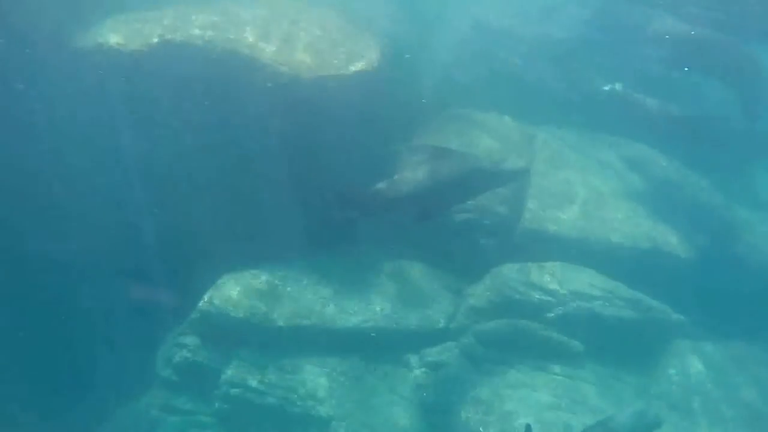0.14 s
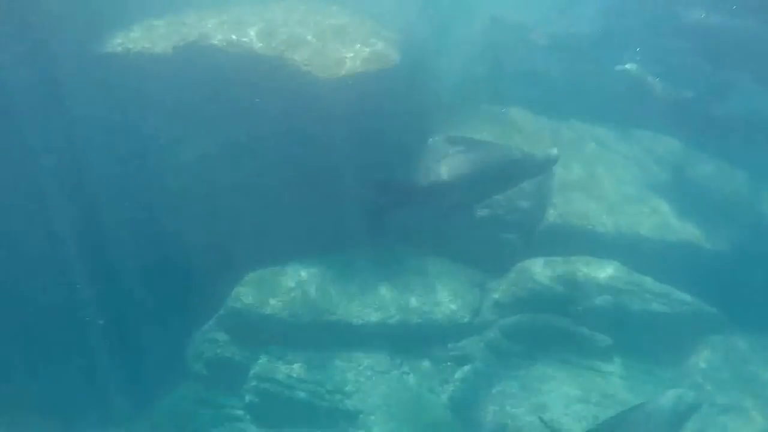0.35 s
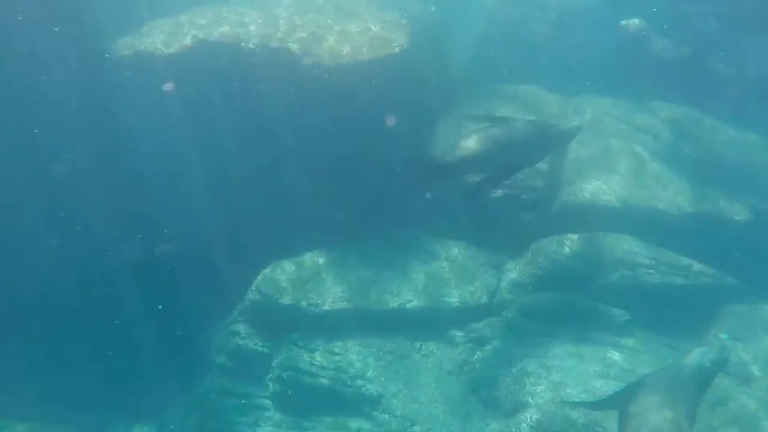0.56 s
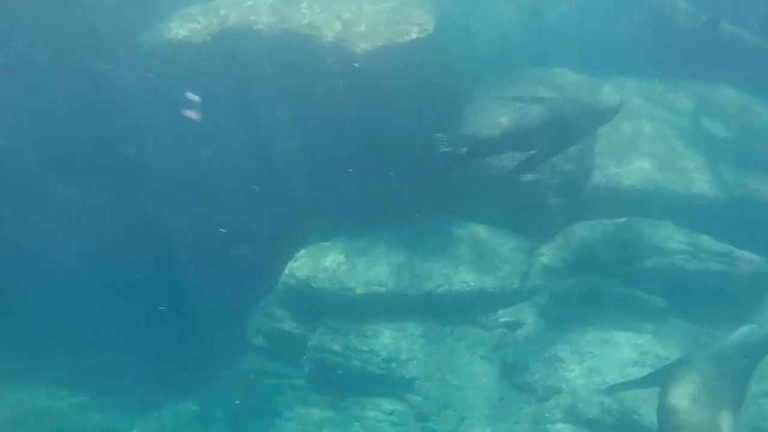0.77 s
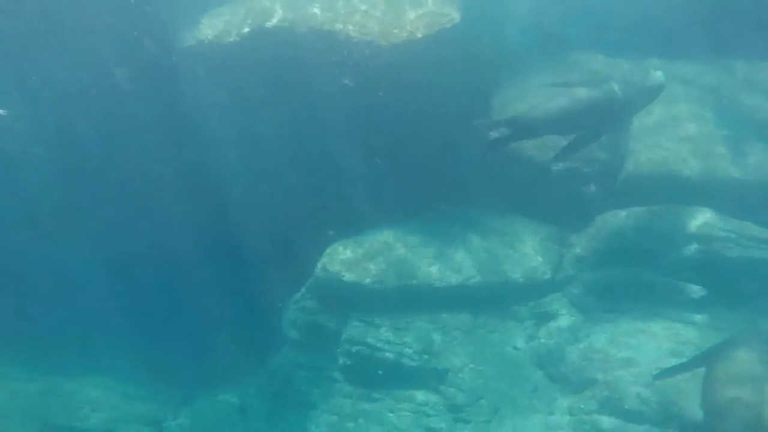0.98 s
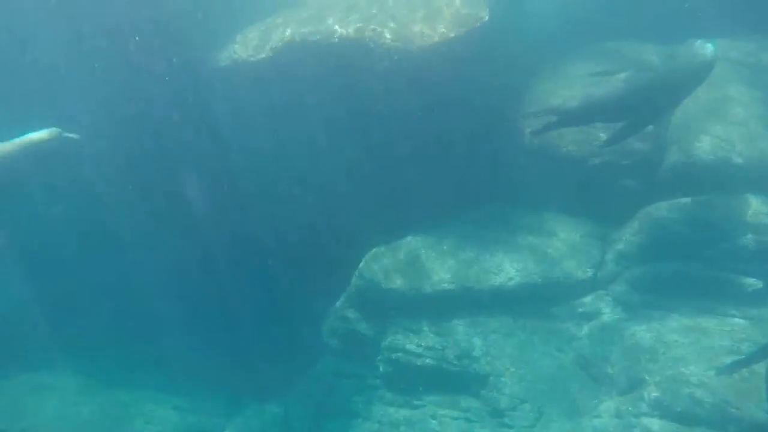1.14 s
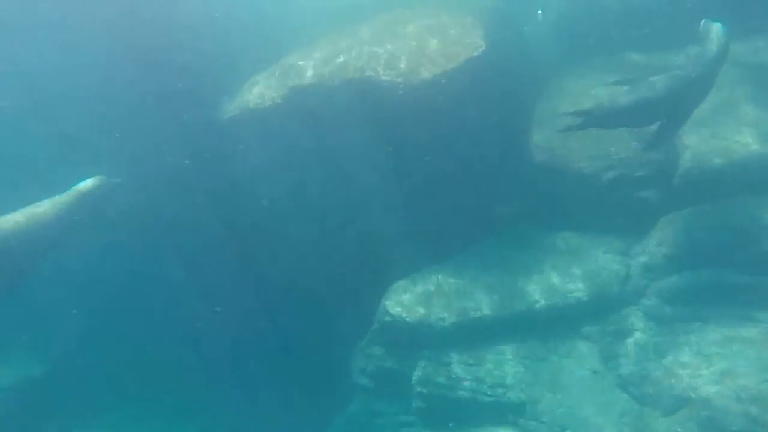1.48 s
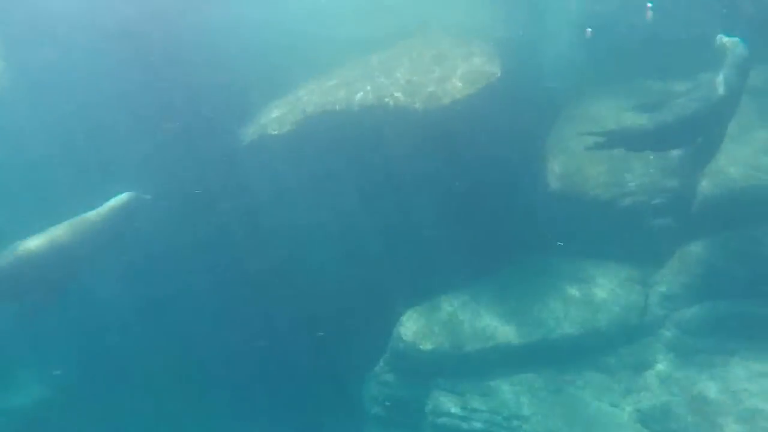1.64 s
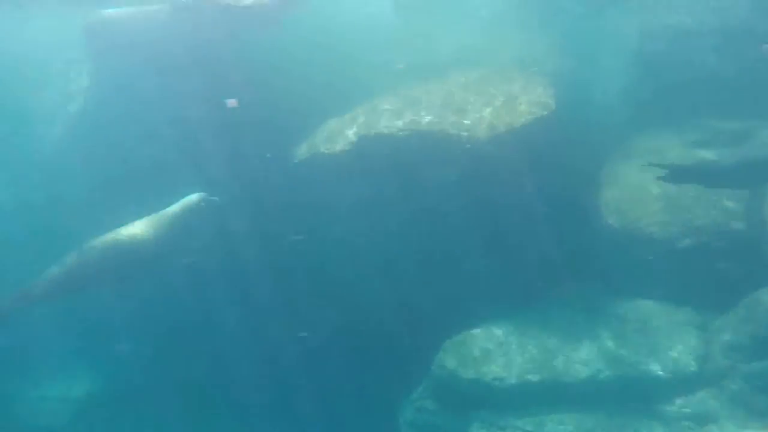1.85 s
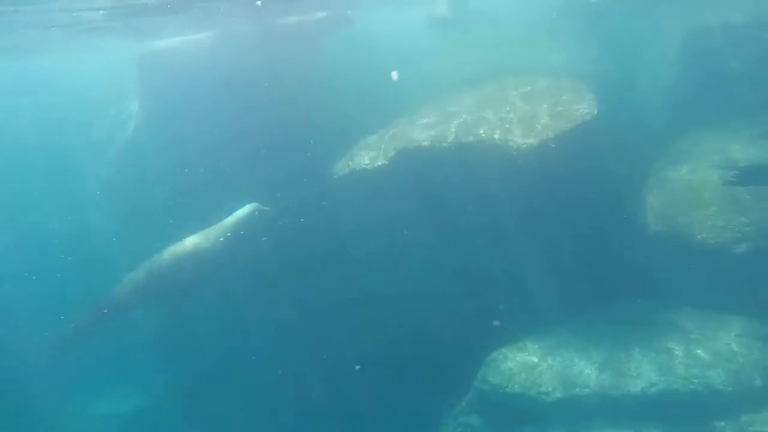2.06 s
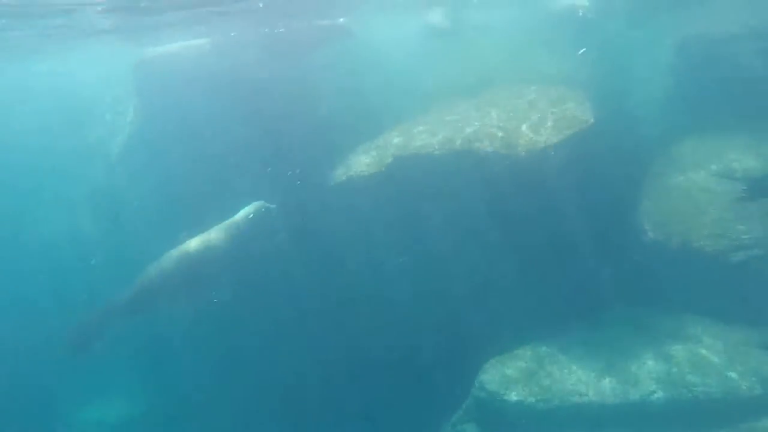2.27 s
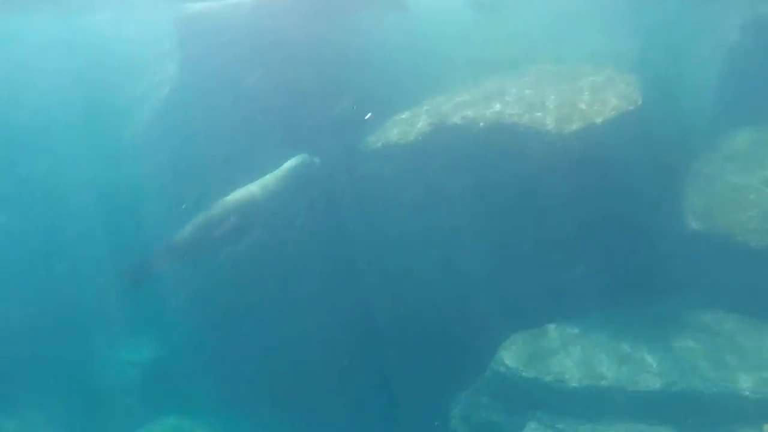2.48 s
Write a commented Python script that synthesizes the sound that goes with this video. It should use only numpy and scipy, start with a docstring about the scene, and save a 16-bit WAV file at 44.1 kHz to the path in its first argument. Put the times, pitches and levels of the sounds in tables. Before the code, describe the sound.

Underwater rumble, a deep uneven throb of water pressing on a sealed microphone case, heaviest in the first 0.3 seconds and surging on throughout. Small bubbles snap and ping close by, with hard knocks near 0.6 and 0.9 seconds and hollow rising bloops clustered from 0.5 to 1.45. Afterwards it thins to scattered clicks, a low bloop near 2.2 and more ticks to the end, over faint hiss, crackle and gurgle.

```python
"""Sealed microphone under water

A microphone in a sealed housing is carried through shallow sea water by a swimmer.
Flow presses on the case as a deep throb, made of evened low noise; small bubbles snap and ping against it
as bursts through resonators, and big ones bloop as rising, dying sines. Clumped grains of fine crackle and
gurgle and a faint coloured hiss fill the gaps. The case rings near 630 Hz and at about 1.5-4 kHz."""
import sys
import numpy as np
from scipy import signal
from scipy.fft import rfft, irfft, next_fast_len
from scipy.io import wavfile
from scipy.ndimage import uniform_filter1d

SR = 44100
rng = np.random.default_rng(int(sys.argv[2]) if len(sys.argv) > 2 else 0)


def attenuation_scalar(level_db):
    """Turn a level in dB into a linear amplitude multiplier (20 dB per decade)."""
    decades = np.asarray(level_db, float) / 20
    return 10 ** decades


def wav_out(sig):
    """Save sig, one row per channel (or a flat mono array), as 16-bit PCM at SR to the path in sys.argv[1]."""
    wavfile.write(sys.argv[1], SR, np.round(np.clip(np.atleast_2d(sig).T, -1, 1) * 32767).astype(np.int16))


N = 115542  # length [samples]


def rms_one(x):
    """Normalisation: scale a signal to an rms of 1."""
    return x / np.sqrt(np.mean(x ** 2) + 1e-20)


def in_time(rows):
    """Linear interpolation: the columns of a table joined by straight lines in time."""
    s, *columns = np.transpose(rows)
    return [np.interp(np.arange(N) / SR, s, c) for c in columns]


def at_hz(points, hz):
    """Spectral envelope: levels in dB joined by straight lines on a log-frequency axis."""
    point_hz, point_db = np.transpose(points)
    return np.interp(np.log(hz), np.log(point_hz), point_db)


def coloured(points):
    """Spectral shaping: white noise weighted by a spectrum, rms 1."""
    size = next_fast_len(N)
    hz = np.maximum(np.arange(size // 2 + 1) * SR / size, 1)
    white = rfft(rng.standard_normal(size))
    return rms_one(irfft(white * attenuation_scalar(at_hz(points, hz)), size)[:N])


def drift(rate):
    """Low-passed noise: a slow random wander of rms 1, with two equal poles at the rate in Hz."""
    r = np.exp(-2 * np.pi * rate / SR)
    settled = signal.lfilter([1], [1, -2 * r, r * r], rng.standard_normal(N + SR))[SR:]
    return rms_one(settled)


def ring(clicks, hz, t60):
    """Damped resonance: a unit click sets off a sine of initial height 1 that loses 60 dB in t60."""
    r = attenuation_scalar(-60 / (t60 * SR))
    w = 2 * np.pi * hz / SR
    return signal.lfilter([0, np.sin(w)], [1, -2 * r * np.cos(w), r * r], clicks + 1e-18)


def add(out, s, sound):
    """Superposition: mix a sound in at time s."""
    i = int(s * SR)
    out[i:i + len(sound)] += sound[:N - i]


def grains(per_s, spread_db, cycles, spectrum, clump_db, waver_s, count):
    """Shot noise: random bubbles in clumps, each ringing for some cycles at its pitch, wavering by waver_s."""
    sizes = attenuation_scalar(spread_db * np.minimum(rng.exponential(1, N), 5)) * rng.choice([-1, 1], N)
    born = rng.random(N) < per_s * attenuation_scalar(clump_db * drift(12)) / SR
    pitches = np.geomspace(spectrum[0][0], spectrum[-1][0], count)
    dealt = rng.integers(0, count, N)  # which pitch each bubble gets
    n = np.arange(N)
    paths = [n + waver_s * SR * drift(5.26) for _ in range(3)]  # wandering delays bend the pitch
    total = np.zeros(N)
    for k, hz in enumerate(pitches):
        rung = ring(sizes * born * (dealt == k), hz, cycles / hz)
        total += attenuation_scalar(at_hz(spectrum, hz)) * np.sqrt(hz) * np.interp(paths[k % 3], n, rung)
    return rms_one(total)


# stir of the water round the case: (time [s], fine crackle level [dB], gurgle level before low-pass [dB])
STIR = [(0, -59, -50.5), (.2, -59, -59.5), (.36, -49.5, -59), (.58, -55, -54), (.68, -54.5, -43),
        (.8, -63.5, -61.5), (.93, -52, -47), (1.1, -56, -47.5), (1.35, -61.5, -52), (1.65, -62, -57),
        (1.95, -60, -54), (2.18, -62.5, -53), (2.3, -51, -57.5), (2.4, -66.5, -57.5), (2.55, -58.5, -50.5)]


def stir():
    """Common modulation: the level curves of crackle and gurgle, which hiss and cavity partly follow."""
    return in_time(STIR)


# relative spectrum of the hiss: (frequency [Hz], density [dB per Hz])
HISS = [(500, -18.5), (1050, -20), (1970, -19.5), (2950, -10), (4700, -17.5), (10000, -18), (11500, -26),
        (14500, -22.5), (15300, -62)]


def hiss(crackle_db):
    """Broadband noise: a faint coloured hiss that follows the crackle weakly and flutters."""
    follow_db = 0.3 * (crackle_db - crackle_db.mean())
    flutter_db = 0.53 * drift(6.1) + 3.1 * drift(27)
    return attenuation_scalar(-61 + follow_db + flutter_db) * coloured(HISS)


def cavity(gurgle_db):
    """Cavity resonance: noise stirs an air pocket in the case all the time, through two resonators."""
    pitch_hz, t60_s = 629.5, 0.05
    follow_db = 0.5 * (gurgle_db - gurgle_db.mean())
    level_db = -58.5 + follow_db + 1.74 * drift(3.7)
    once = ring(rng.standard_normal(N), pitch_hz, t60_s)
    return attenuation_scalar(level_db) * rms_one(ring(once, pitch_hz, t60_s / 2))


# relative strength of crackle bubbles by pitch: (frequency [Hz], level [dB])
CRACKLE = [(1150, -2), (1700, 6), (2900, 12.5), (4000, 7), (5200, 5.5)]


def crackle(crackle_db):
    """Shot noise of small bubbles: dense, strongly clumped grains at steady high pitches."""
    return attenuation_scalar(crackle_db) * grains(2500, 3.2, 30.0, CRACKLE, clump_db=6.5, waver_s=0, count=30)


# relative strength of gurgle bubbles by pitch: (frequency [Hz], level [dB])
GURGLE = [(110, -9.5), (190, -8), (260, -15.5), (400, -1), (630, 1), (800, 2), (1000, -42)]


def gurgle(gurgle_db):
    """Shot noise of larger bubbles: low grains of wavering pitch, low-passed at 900 Hz."""
    bubbles = attenuation_scalar(gurgle_db) * grains(900, 2.2, 25.0, GURGLE, clump_db=2.5, waver_s=0.002026, count=30)
    return signal.sosfilt(signal.butter(2, 900, fs=SR, output="sos"), bubbles)


# big bubbles: (time [s], level before attack, decay and wobble [dB], starting pitch [Hz], t60 [s])
BLOOPS = [(0.016, -44, 326, 0.27), (0.252, -36.5, 281, 0.035), (.478, -44.5, 612, 0.17),
          (.512, -26.5, 628, 0.13), (.602, -21, 653, 0.028), (.608, -19, 790, 0.011),
          (.637, -31.5, 629, 0.08), (.665, -32, 673, 0.094), (.698, -31, 580, 0.058),
          (0.699, -34.5, 907, 0.045), (0.725, -36.5, 352.4, 0.22), (.9128, -14, 737, 0.015),
          (0.914, -33.5, 172, 0.12), (.918, -31, 704, 0.013), (0.967, -34.5, 160.4, 0.099),
          (1.045, -40.5, 488, 0.18), (1.084, -34, 208, 0.12), (1.091, -32.5, 427, 0.046),
          (1.132, -32.5, 480, 0.041), (1.315, -38.5, 524, 0.1), (1.35, -45.5, 218, 0.12),
          (1.452, -37.5, 737, 0.11), (2.17, -39, 143, 0.12), ]


def bloops():
    """Bubble resonance: a big bubble is a dying sine that climbs in pitch; the level wobbles."""
    attack_cycles, wobble_db = 0.35, 1.8
    out = np.zeros(N)
    for s, db, hz, t60 in BLOOPS:
        t = np.arange(int(t60 * SR)) / SR
        rise = 0.7 if hz < 260 else 0.086  # share of the pitch gained over one t60; deep ones climb more
        wave = np.sin(2 * np.pi * hz * (t + rise * t ** 2 / (2 * t60)))
        attack = 1 - np.exp(-t * hz / attack_cycles)
        add(out, s, attenuation_scalar(db - 60 * t / t60) * attack * wave)
    return out * attenuation_scalar(wobble_db * drift(37.5))


# clean small bubbles, and hard knocks as very short rings:
# (time [s], peak level [dB], pitch [Hz], t60 of the slower resonance [s])
PINGS = [(0.294, -26.5, 3100, 0.01), (0.334, -39.5, 2245, 0.036), (0.363, -40, 4300, 0.017),
         (0.365, -45.5, 1340, 0.055), (0.426, -31.5, 2510, 0.017), (0.4465, -37.5, 3170, 0.018),
         (0.4597, -35, 2470, 0.024), (0.484, -35, 2480, 0.012), (0.541, -26, 2950, 0.0051),
         (0.5907, -33, 2555, 0.027), (0.601, -15, 2700, 0.0054), (0.8953, -16, 2484, 0.007),
         (0.899, -20, 2750, 0.0076), (.9110, -16.5, 2700, 0.0035), (0.989, -42, 1550, 0.039),
         (1.178, -35, 3200, 0.014), (1.8657, -36, 3400, 0.014), (1.908, -33, 4200, 0.0039),
         (2.053, -43, 1460, 0.013), (2.085, -28, 3870, 0.0058), (2.282, -40.5, 1694, 0.035),
         (2.3617, -35.5, 2930, 0.012)]


def pings():
    """Cascaded resonance: a click rings twice at one pitch, for a rounded start and no broad tick."""
    out = np.zeros(N)
    click = 1. * (np.arange(SR // 16) == 0)
    for s, db, hz, t60 in PINGS:
        tone = ring(ring(click, hz, t60), hz, t60 / 4.9)
        add(out, s, attenuation_scalar(db) * tone / np.abs(tone).max())
    return out


# modes of the case: (frequency [Hz], strength before random spread [dB], t60 [s])
CASE = [(1506, -13, 0.017), (1735, -14, 0.027), (2152, -7.5, 0.025), (2480, -3, 0.013), (2930, 0, 0.011),
        (3276, -1.5, 0.017), (3707, -1.5, 0.0087), (4078, -8, 0.013)]


def case_ring(knock, strength):
    """Modal synthesis: a knock rings every mode of the case, with alternating sign."""
    total = 0
    for k, ((hz, db, t60), spread_db) in enumerate(zip(CASE, strength)):
        total = total + attenuation_scalar(db + spread_db) * ring(knock, hz, t60) * (-1) ** k
    return total


# bubbles snapping on the case: (time [s], peak level of the early case ring [dB],
# bright crack relative to that ring, less 9.5 [dB], trailing fizz drive relative to the burst [dB])
SNAPS = [(0.0722, -30.5, -14, -10), (0.2037, -38.5, -8.5, -16), (0.2911, -28.5, -10.5, -18.5),
         (0.3516, -38, -12, -1), (0.39, -44.5, -4.5, -11), (0.415, -37, -10.5, -23),
         (0.4452, -34, -11.5, -11), (0.511, -34, -22, 7), (0.6418, -39.5, -22, -11),
         (0.6986, -41.5, -7, -18), (0.7434, -41, -8, -5), (0.7933, -45, -2, -27),
         (0.8369, -23.5, -18.5, -13), (0.894, -25.5, -15.5, -6), (0.972, -37.5, -11, -5),
         (1.0229, -28.5, -20, -14), (1.117, -50, -1.5, -8), (1.1786, -37.5, 1, -18),
         (1.308, -40.5, -12, -12.5), (1.4432, -39, -9, 19), (1.4708, -49, 4, -32), (1.6153, -33, -22.5, 2),
         (1.909, -40, -2.5, -9), (2.0837, -31.5, -14, -18.5), (2.1122, -47, -2.5, 6),
         (2.225, -40.5, -51, -7), (2.2792, -40, -21, -4), (2.3097, -34.5, -14, -15.5),
         (2.3848, -35, -7, -21), (2.4278, -30, -9.5, -21), (2.527, -38, -13, -24), (2.58, -37.5, -9, -3)]


def snaps():
    """Impulsive excitation: a short burst rings the case, cracks brightly and trails grainy fizz."""
    snap_s, crack_s, fizz_s = 0.001, 0.0007, 0.024  # decay time constants
    out = np.zeros(N)
    t = np.arange(SR // 8) / SR
    early = slice(SR // 200)  # first 5 ms, where peaks are taken
    body = signal.butter(3, [1300, 4800], "band", fs=SR, output="sos")
    bright = signal.butter(2, [3600, 8500], "band", fs=SR, output="sos")
    strengths = rng.normal(0, 3.85, (len(SNAPS), len(CASE)))  # dB
    noises = rng.standard_normal((len(SNAPS), 2, len(t)))
    for (s, db, crack_db, fizz_db), strength, (spray, burst) in zip(SNAPS, strengths, noises):
        fizz = attenuation_scalar(fizz_db) * np.exp(-t / fizz_s)
        grainy = fizz * np.abs(burst) ** 3 / 8.0  # times burst: the fourth power favours the rare strong samples
        knock = signal.sosfilt(body, burst * (np.exp(-t / snap_s) + grainy))
        case = case_ring(knock, strength)
        # the fizz dies twice as fast in the crack
        crack = signal.sosfilt(bright, spray * (np.exp(-t / crack_s) + fizz * np.exp(-t / fizz_s)))
        case = case / np.abs(case[early]).max()
        crack = attenuation_scalar(crack_db + 9.5) * crack / np.abs(crack[early]).max()
        add(out, s, attenuation_scalar(db) * (case + crack))
    return out


# push of the flow on the case: (time [s], level [dB])
SURGE = [(0, -17.5), (.11, -34.5), (.14, -20.5), (.41, -33), (.49, -27.5), (.63, -32.5), (.68, -25),
         (.93, -29.5), (1.01, -24.5), (1.06, -36.5), (1.24, -24.5), (1.33, -35), (1.38, -31.5),
         (1.63, -31.5), (1.68, -26), (1.99, -33), (2.2, -27), (2.49, -25.5), (2.53, -33)]
# relative spectrum of the throb before it is evened: (frequency [Hz], density [dB per Hz])
THROB = [(12, -35), (22, 2), (30, 0), (38, 3.5), (50, -11.5), (64, -10.5), (85, -26.5), (115, -43.5),
         (300, -100)]


def throb():
    """Turbulent pressure on the case: deep noise, evened out, carried by the surge."""
    evened = 0.5  # exponent: share of the noise's own flutter that is smoothed away
    lump_share = 0.06  # share of the cubed throb mixed in: stronger crests add short bumps up to about 200 Hz
    deep = coloured(THROB)
    flutter = np.sqrt(uniform_filter1d(deep ** 2, size=SR // 25)) + 0.045
    deep = rms_one(deep / flutter ** evened)
    lump_band = signal.butter(2, [75, 220], "band", fs=SR, output="sos")
    lumps = signal.sosfilt(lump_band, deep * np.abs(deep) ** 2)
    surge_db, = in_time(SURGE)
    return attenuation_scalar(surge_db) * (deep + lump_share * lumps)


def scene():
    """Superposition: all sources add as they reach the microphone."""
    crackle_db, gurgle_db = stir()
    background = hiss(crackle_db) + cavity(gurgle_db) + crackle(crackle_db) + gurgle(gurgle_db)
    bubbles = bloops() + pings() + snaps()
    return (background + bubbles + throb())[None]


def roll_off(x):
    """The treble ends steeply here."""
    return signal.sosfilt(signal.butter(12, 15380, fs=SR, output="sos"), x)


def record(dry):
    """Transmission chain: the finished mix passes on at its own level."""
    return roll_off(dry)


dry = scene()
out = record(dry)
wav_out(out)
```